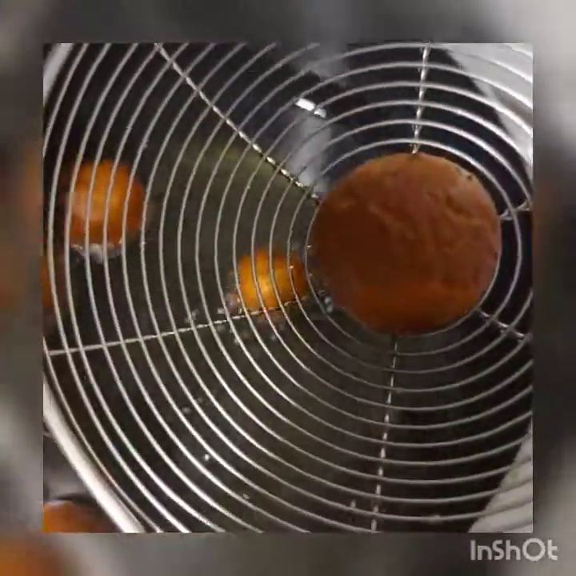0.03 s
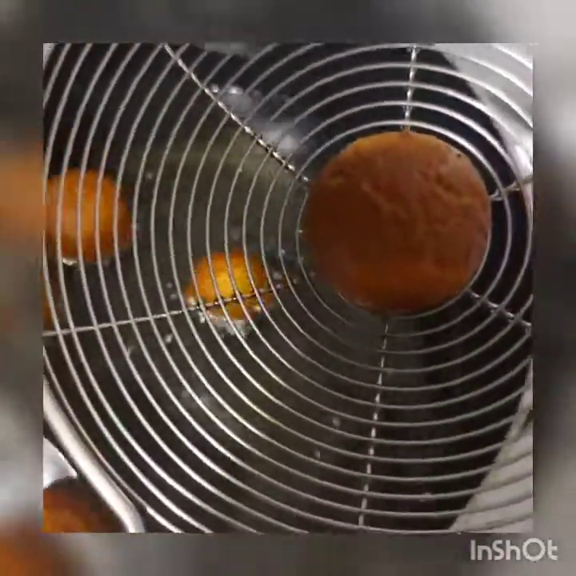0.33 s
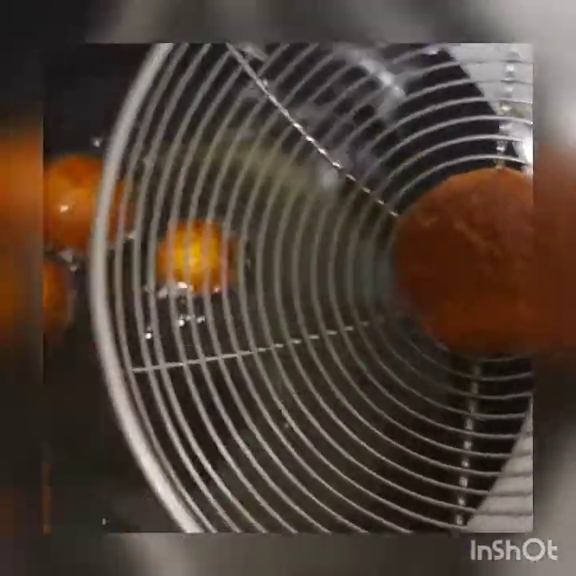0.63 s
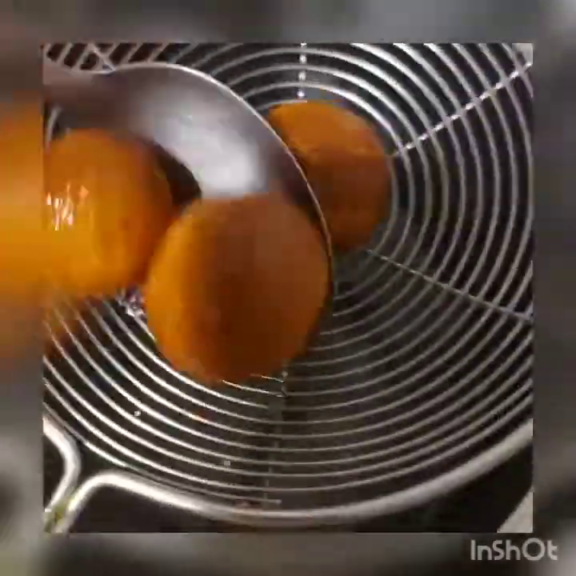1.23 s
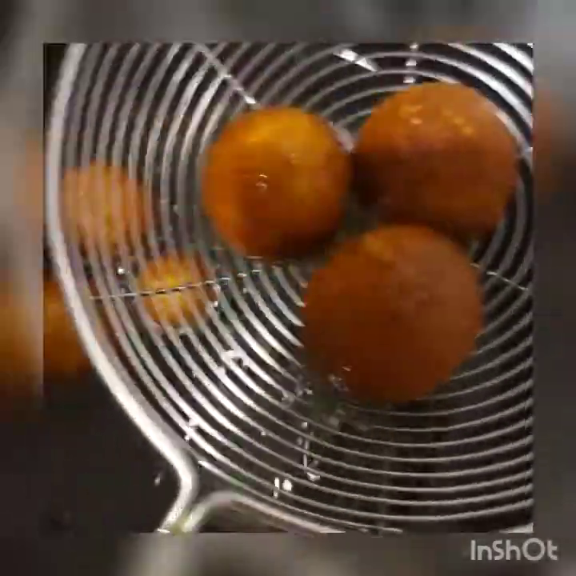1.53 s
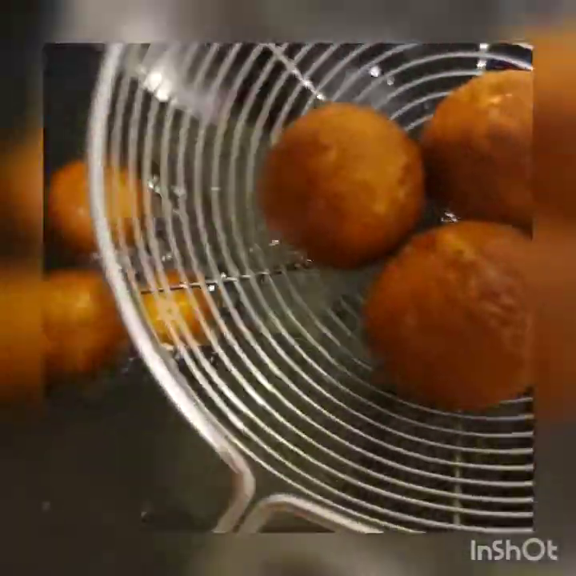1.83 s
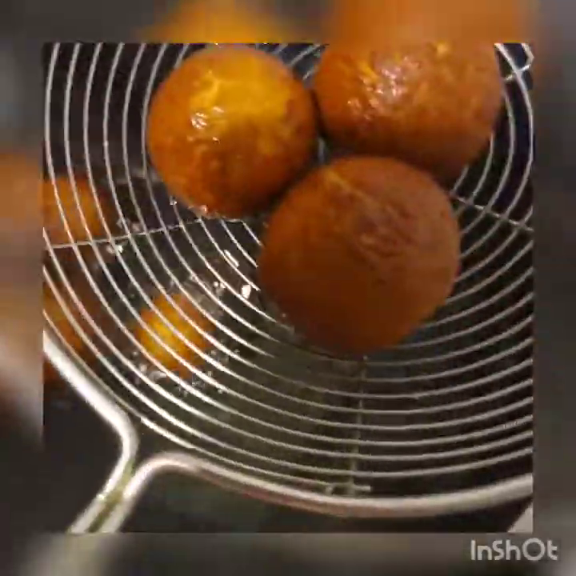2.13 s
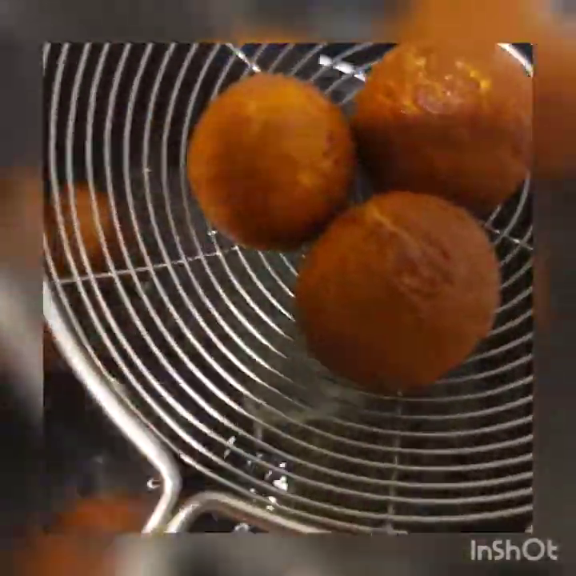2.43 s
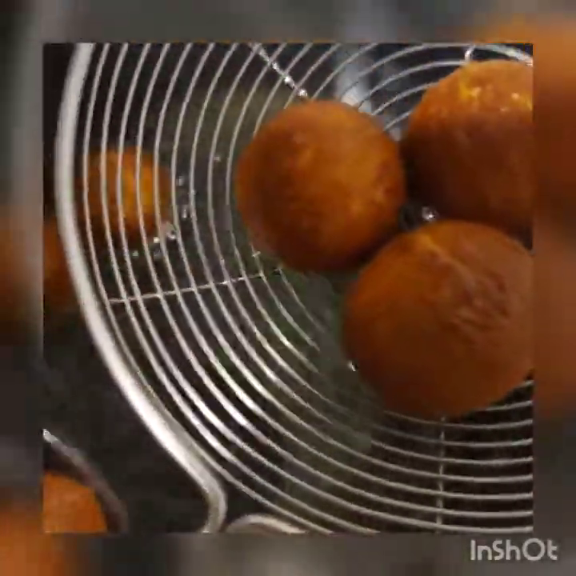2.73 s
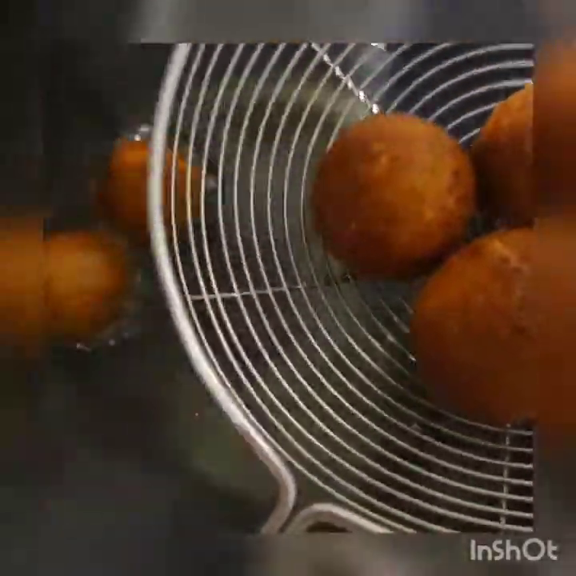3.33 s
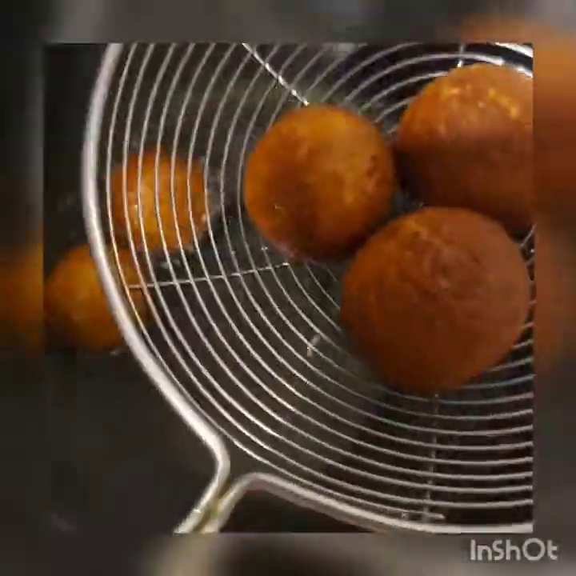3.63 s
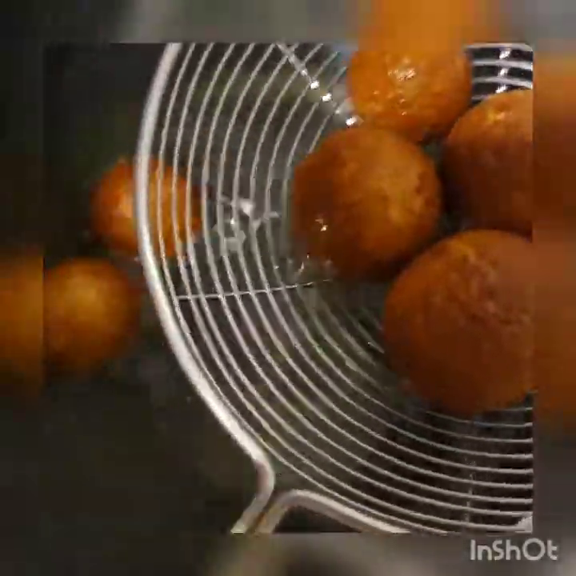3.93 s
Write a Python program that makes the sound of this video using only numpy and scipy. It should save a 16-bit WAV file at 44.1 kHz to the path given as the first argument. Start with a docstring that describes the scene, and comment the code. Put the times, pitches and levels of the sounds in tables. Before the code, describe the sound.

A few light metal clinks of a spoon and wire strainer, with oil gently frying.

```python
"""Dough balls are lifted from hot oil in a small kitchen; bursting bubbles fizz over a mains hum.
First a wire strainer scrapes the pan and excites its modes, while the stirred oil seethes and spits.
The loaded strainer is then set down hard, with a clash and a thump, and a short groan follows.
A steel spoon raps on a rim, a low drone swells, and the spoon clinks on the wires.
Last, the strainer knocks on the pan and rubs along it."""
import sys
import numpy as np
from scipy import signal
from scipy.fft import rfft, irfft
from scipy.io import wavfile

SR = 44100
rng = np.random.default_rng(int(sys.argv[2]) if len(sys.argv) > 2 else 0)


def pcm_store(signal):
    """Save signal as 16-bit PCM."""
    levels = np.round(np.clip(np.atleast_2d(signal), -1, 1) * 32767)
    wavfile.write(sys.argv[1], SR, levels.astype(np.int16).T)


N = 176400


def frying_pan():
    """Friction excitation: the chattering strainer builds up the pan's modes, then damps them at rest."""
    # Each row: frequency in Hz, level in dB, decay time to -60 dB (t60) in seconds.
    pan_modes = [(308.2, -5.5, 0.97), (1000, -11, 0.68), (1607, -0.5, 0.52), (2327, -8, 0.28),
                 (2730, -21, 0.21), (3465, -10.5, 0.29), (3990, -16.5, 0.31), (5970, -24, 0.26),
                 (6680, -11, 0.25), (6780, -18, 0.4), (10900, -21, .4), (13800, -11, 0.14)]
    # Each row: frequency in Hz, relative spectral density in dB.
    chatter_spectrum = [(150, -12), (600, -3), (1200, -8), (2500, -6.5), (4000, -14.5), (5500, -27),
                        (9500, -16), (13000, -12.5), (16000, -35)]
    # Each row: start in seconds, level in dB, scrape length in seconds, relative chatter level in dB,
    # brightness in dB per octave, factor on the decay times.
    contacts = [(0.1308, -36.5, 0.026, 2.5, 3, 0.77), (0.228, -51, 0.041, 8.5, -5, 0.37),
                (1.796, -34, 0.0011, -10, -2, 0.56), (2.521, -35.5, .002, -10, -8, 0.48),
                (3.8827, -45, 0.0013, 9, -1.5, 0.88)]
    tones, scrapes, t = np.zeros((2, N)), np.zeros((2, N)), np.arange(SR) / SR
    strongest_hz = pan_modes[2][0]
    for start, db, length, chatter_db, bright_db, decay_factor in contacts:
        modes = [(hz, level + bright_db * np.log2(max(hz / strongest_hz, 1)), t60 * decay_factor)
                 for hz, level, t60 in pan_modes]
        chatter = diffuse(noise(chatter_spectrum, size=SR)) * amp(2.2 * wander(167)[:SR])
        release = np.exp(-np.maximum(t - length, 0) / 0.0043)
        add(tones, start, amp(db) * ring(modes, apart_hz=2170) * rise(0.3 * length))
        add(scrapes, start, amp(db + chatter_db - 9) * chatter * release)
    return room(tones, wet_db=-6, early_db=-7) + room(scrapes, wet_db=0.5, early_db=-1.5)


def strainer():
    """Impact excitation: the wires clash in high modes while the loaded basket flexes in low ones."""
    # Each row: frequency in Hz, level in dB, t60 in seconds.
    wire_modes = [(1004, -12.5, 0.1), (1660, -3.5, 0.03), (3520, -13.5, 0.1), (4260, -2.5, 0.025),
                  (5990, -3.5, 0.033), (6820, -7, .1), (9250, 3, 0.024), (10910, -2, .06),
                  (10640, -1.5, 0.036), (11240, -15, .08), (13980, 4, .04), (15300, -14, .05)]
    basket_modes = [(178.4, -11.5, 0.21), (230, -9, 0.13), (309, 1, 0.11), (328.5, -13, 0.083),
                    (437, -11, 0.22), (582, -8.5, .12)]
    # Each row: frequency in Hz, relative spectral density in dB.
    clash_spectrum = [(150, 1), (500, 5.5), (1300, -2), (2600, -5), (4000, -3), (5300, -3), (7800, -4.5),
                      (9400, 3), (11500, 6.5), (12800, 1), (14200, -1), (16000, 0)]
    # Each row: start in seconds, level in dB, left minus right in dB, brightness in dB per octave.
    hits = [(1.7961, -19, 1.5, 0.5), (1.806, -30.5, -16, -6)]
    # Each row: start in seconds, level in dB.
    thumps = [(1.7983, -26.5), (1.8044, -19.5)]
    clash = strikes(hits, wire_modes, clash_spectrum, crack_db=8.5, crack_t60=0.019, contact_s=0.00039)
    thump = np.zeros((2, N))
    for start, db in thumps:
        add(thump, start, amp(db) * ring(basket_modes) * rise(0.0034))
    return room(clash, wet_db=-8.5, early_db=-5) + room(thump, wet_db=-5.5, early_db=-25)


def spoon():
    """Damped free vibration: the spoon clinks brightly on the wires and bounces more dully on a rim."""
    # Each row: frequency in Hz, level in dB, t60 in seconds.
    spoon_modes = [(2945, -21, 0.07), (3380, -12, .013), (4160, -20, .03), (6320, -14, 0.02),
                   (8600, -28, 0.023), (10040, -2, .01), (11780, 6, 0.014), (11380, -3, 0.018),
                   (13930, -13, .025), (14660, -9, .013)]
    rim_modes = [(840, -2.5, 0.014), (2310, -1.5, 0.026), (2700, -2, 0.026), (3425, -4.5, 0.026),
                 (4470, -5, .012), (5916, -18, 0.028), (6580, -12, .04), (8700, -19, .025)]
    # Each row: frequency in Hz, relative spectral density in dB.
    clink_spectrum = [(200, -32), (2500, -9.5), (3600, 2.5), (5000, -27), (6500, -8), (7600, -31),
                      (9000, 6), (10500, -3), (11500, 2), (12600, -24), (15300, -8), (16000, -18)]
    rap_spectrum = [(150, -1), (750, 0.5), (1700, -1.5), (2600, -5), (4200, -5), (5300, -7), (7700, -8.5),
                    (9000, -2), (10500, -23), (13500, -2), (16000, -28)]
    # Each row: start in seconds, level in dB, left minus right in dB, brightness in dB per octave.
    clinks = [(3.6586, -15.5, 5.5, 3.5)]
    raps = [(2.5197, -21, 0.5, -0.5), (2.6015, -39, 3, -11), (2.6045, -34.5, -1, -8), (2.616, -48, 0, -6)]
    clink = strikes(clinks, spoon_modes, clink_spectrum, crack_db=-3, crack_t60=0.0097, contact_s=0.0012)
    rap = strikes(raps, rim_modes, rap_spectrum, crack_db=4, crack_t60=0.015, contact_s=0.0006)
    return room(clink, wet_db=-11.5, early_db=-8.5) + room(rap, wet_db=-7, early_db=-13)


def rubbing():
    """Sliding friction: wires rasp along the pan, and random slips drive resonances in a hollow groan."""
    # Each row: start in seconds, length in seconds, level in dB.
    rubs = [(3.967, .05, -42.5)]
    # Each row: frequency in Hz, relative spectral density in dB.
    rub_spectrum = [(150, 10), (1000, 2.5), (2100, 2.5), (3500, -6), (5500, -2), (7500, 4), (10000, 3),
                    (13000, -4), (16000, -15)]
    # Each row: centre frequency in Hz, bandwidth in Hz, relative level in dB.
    resonances = [(450, 8.8, 5), (670, 16, 0), (1100, 70, -2.5), (1540, 120, -20), (2580, 1100, -40)]
    groan_start_s, groan_length_s, groan_db = 2.143, 0.071, -51.5
    out = np.zeros((2, N))
    for start, length, db in rubs:
        size = int(length * SR)
        grit = amp(db + 3.5 * wander(200)[:size])
        add(out, start, grit * noise(rub_spectrum, size) * signal.windows.tukey(size, 0.1))
    slips = rng.standard_normal(int(groan_length_s * SR))
    groan = sum(amp(db) * unit(signal.lfilter(*signal.iirpeak(hz, hz / width, SR), slips))
                for hz, width, db in resonances)
    add(out, groan_start_s, amp(groan_db) * balance(0) * groan * signal.windows.tukey(len(slips), 0.3))
    return room(out, wet_db=-4, early_db=-21.5)


def spits():
    """Impulsive bursts: single drops of hot oil each radiate a thin, quickly decaying tick."""
    # Each row: start in seconds, level in dB, left minus right in dB.
    drops = [(0.9936, -35, 1), (1.5192, -26.5, 11), (2.1141, -40, 8)]
    # Each row: frequency in Hz, relative spectral density in dB.
    tick_spectrum = [(1000, -45), (8000, -32), (10500, -9), (11800, 2), (13200, -6), (16000, -14)]
    out = np.zeros((2, N))
    envelope = rise(0.00078) * decay(np.arange(SR) / SR, t60=0.014)
    for start, db, side_db in drops:
        add(out, start, amp(db) * balance(side_db) * diffuse(noise(tick_spectrum, size=SR)) * envelope)
    return room(out, wet_db=-10, early_db=-15)


def oil():
    """Shot noise: tiny bubbles burst at random over a steady fizz, and seething follows the stirring."""
    # Each row: frequency in Hz, relative spectral density in dB.
    fizz_spectrum = [(2000, -23), (4500, -9), (8300, -9.5), (9300, 0), (11500, 0), (13500, -3), (15700, -7)]
    seethe_spectrum = [(300, -14), (700, 1.5), (1100, 0), (2400, 1), (3400, -7.5), (4500, -5.5),
                       (7000, -17.5), (12000, -25)]
    # Each row: time in seconds, seething level in dB.
    stirring = [(0, -56.5), (.55, -59), (.68, -51), (.9, -54.5), (1.08, -57.5), (1.2, -50.5), (1.5, -62),
                (2.4, -63), (4, -66)]
    fizz_db, pops_db, pop_spread_db, pops_per_s = -51.5, -57.5, 4.5, 500
    strengths = amp(pop_spread_db * np.minimum(rng.exponential(1, (2, N)), 5))
    bursts = rng.random((2, N)) < pops_per_s / SR
    pops = amp(pops_db) * colour(strengths * bursts, fizz_spectrum)
    fizz = noise(fizz_spectrum) * amp(fizz_db + 0.36 * wander(8.8))
    seethe = noise(seethe_spectrum) * amp(curve(stirring) + 1.3 * wander(35))
    return (fizz + pops) * balance(1) + seethe


def kitchen():
    """Superposition: diffuse room air, a wavering mains hum and a low drone that swells and rises."""
    # Each row: frequency in Hz, relative spectral density in dB.
    air_spectrum = [(20, -26), (35, -4.5), (55, -2.5), (80, -4.5), (125, 5.5), (200, -7.5), (320, -6),
                    (550, -17), (800, -18), (1100, -16.5), (2000, -24), (4000, -36.5), (16000, -70)]
    # Each row: time in seconds, frequency in Hz, level in dB.
    drone_path = [(1.7, 55.8, -59), (2.3, 55.6, -50), (2.45, 55.5, -54), (2.83, 56.4, -38.5),
                  (3.04, 55.8, -39), (3.14, 61, -49), (3.256, 61, -41), (3.36, 64, -49.5),
                  (3.8, 62.7, -48.5)]
    air_db, hum_db, hum_hz = -44, -43.5, 118.9
    t = np.arange(N) / SR
    air = amp(air_db) * diffuse(noise(air_spectrum))
    hum = amp(hum_db + 1.8 * wander(2.7)) * np.sin(2 * np.pi * hum_hz * t + 0.46 * wander(11))
    drone_phase = 2 * np.pi * np.cumsum(curve(drone_path)) / SR
    drone = amp(curve(drone_path, column=2)) * np.sin(drone_phase)
    return (air + np.sqrt(2) * (hum + drone)) * balance(-1.7)


def strikes(hits, modes, crack_spectrum, crack_db, crack_t60, contact_s):
    """Impact: dense overtones crack while the modes build up; softer contacts excite less treble."""
    out, t = np.zeros((2, N)), np.arange(SR) / SR
    octaves = np.log2(np.maximum(np.fft.rfftfreq(SR, 1 / SR) / 3000, 1))  # brightness acts above 3 kHz
    touch = decay(np.maximum(t - contact_s, 0), crack_t60)
    for start, db, side_db, bright_db in hits:
        tones = ring(modes) * rise(contact_s)
        crack = amp(crack_db) * touch * diffuse(noise(crack_spectrum, size=SR))
        hit = irfft(rfft(tones + crack) * amp(bright_db * octaves), SR)[:, :SR // 2]
        add(out, start, amp(db) * balance(side_db) * hit)
    return out


def ring(modes, apart_hz=3000):
    """Modal superposition: damped sines whose left-right phase gap grows with pitch up to apart_hz."""
    t, shape = np.arange(SR) / SR, (len(modes), 1, 1)
    turns = rng.uniform(0.07, 0.18, shape) * rng.choice([-1, 1], shape) * np.array([[1], [-1]])
    return sum(amp(db) * decay(t, t60) * np.sin(2 * np.pi * (hz * t + turn * min(hz / apart_hz, 1)))
               for (hz, db, t60), turn in zip(modes, turns))


def room(x, wet_db, early_db):
    """Reverberation: early reflections from pan and stove, then a tail whose treble dies first."""
    # Each row: frequency in Hz, t60 in seconds.
    reverb_times = [(150, 0.62), (600, 0.73), (2000, 0.6), (6000, 0.47), (11000, 0.37), (16000, 0.32)]
    t = np.arange(SR) / SR
    echoes = rng.standard_normal((2, SR)) * (rng.random((2, SR)) < 0.15) * (t > 0.004)
    hz, frame_s, bands = signal.stft(echoes, SR, nperseg=256)
    absorbed = bands * decay(frame_s, read(reverb_times, hz)[:, None])
    tail = signal.istft(absorbed, SR, nperseg=256)[1][:, :SR]
    early = rng.standard_normal((2, SR)) * (t > 0.002) * np.exp(-t / 0.007)
    response = (amp(wet_db) * unit(tail) + amp(early_db) * unit(early)) / np.sqrt(SR)
    return x + signal.fftconvolve(x, diffuse(response), axes=1)[:, :N]


def diffuse(x):
    """Spatial coherence: at two nearby points a diffuse field is alike in the bass, unlike in treble."""
    # Each row: frequency in Hz, left-right coherence from 0 to 1.
    coherence = [(60, 1), (130, 0.97), (290, 0.85), (640, 0.48), (1400, 0), (16000, 0.12)]
    size = x.shape[1]
    left, independent = rfft(x)
    shared = read(coherence, np.fft.rfftfreq(size, 1 / SR))
    right = shared * left + np.sqrt(1 - shared ** 2) * independent
    return irfft(np.array([left, right]), size)


def noise(spectrum, size=N):
    """Filtered white noise, uncorrelated left and right."""
    return colour(rng.standard_normal((2, size)), spectrum)


def colour(x, spectrum):
    """Spectral shaping, scaled to rms 1."""
    size = x.shape[-1]
    gain = amp(read(spectrum, np.fft.rfftfreq(size, 1 / SR)))
    return unit(irfft(rfft(x) * gain, size))


def wander(rate_hz):
    """Random modulation: low-passed noise at rms 1."""
    rolloff = 1 + (np.fft.rfftfreq(N, 1 / SR) / rate_hz) ** 4
    return unit(irfft(rfft(rng.standard_normal(N)) / rolloff, N))


def rise(seconds):
    """Linear attack, then held at 1; one second in all."""
    return np.minimum(np.arange(SR) / SR / seconds, 1)


def decay(t, t60):
    """Exponential damping by 60 dB every t60 seconds."""
    return amp(-60 * t / t60)


def amp(db):
    """Decibels to amplitude ratio."""
    return 10 ** (np.asarray(db) / 20)


def unit(x):
    """Normalisation to rms 1."""
    return x / np.sqrt(np.mean(x ** 2) + 1e-20)


def read(points, hz):
    """Interpolation on a log-frequency axis."""
    table_hz, values = np.transpose(points)
    return np.interp(np.log(hz + 1), np.log(table_hz + 1), values)


def curve(points, column=1):
    """Linear interpolation in time, at every sample."""
    columns = np.transpose(points)
    return np.interp(np.arange(N) / SR, columns[0], columns[column])


def balance(db):
    """Left and right gains for a level difference."""
    return amp(np.array([[db], [-db]]) / 2)


def add(mix, start, sound):
    """Superposes a stereo sound from a start in seconds."""
    part = mix[:, round(start * SR):][:, :sound.shape[1]]
    part += sound[:, :part.shape[1]]


def scene():
    """Superposition of all sources at the stove."""
    return frying_pan() + strainer() + spoon() + rubbing() + oil() + spits() + kitchen()


def record(dry):
    """Soft saturation rounds the peaks, then a low-pass filter limits the band."""
    cutoff_hz = 15750
    lowpass = signal.firwin(401, cutoff_hz, window=("kaiser", 8), fs=SR)
    return signal.oaconvolve(np.tanh(dry), lowpass[None], "same")


dry = scene()
out = record(dry)
pcm_store(out)
```